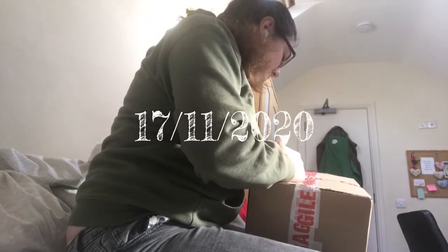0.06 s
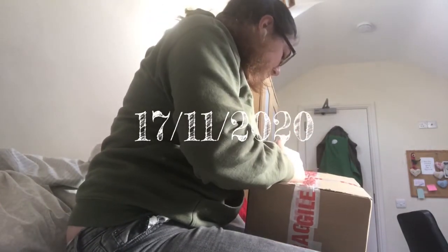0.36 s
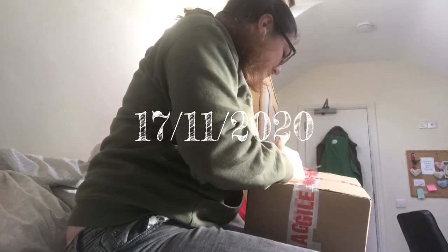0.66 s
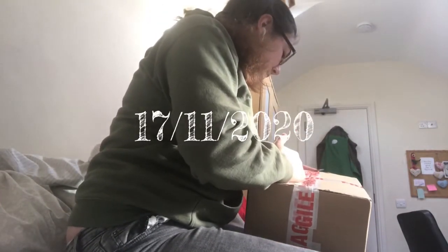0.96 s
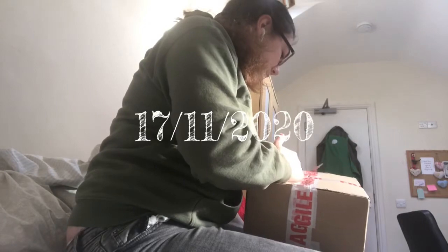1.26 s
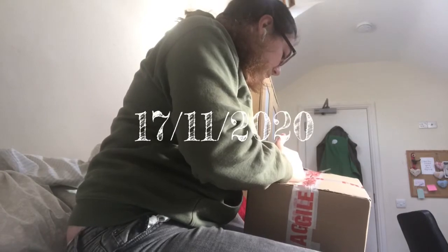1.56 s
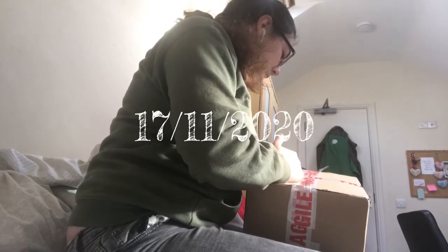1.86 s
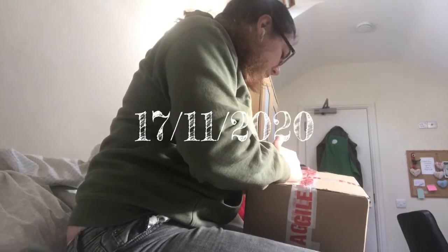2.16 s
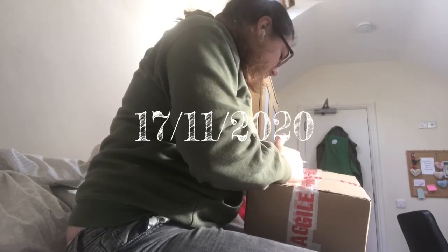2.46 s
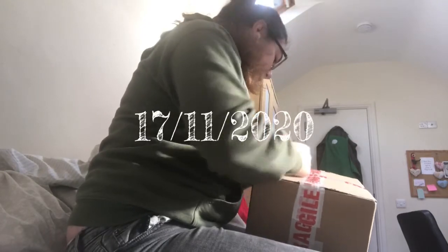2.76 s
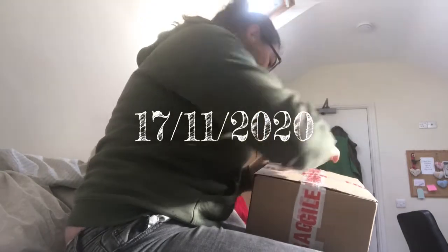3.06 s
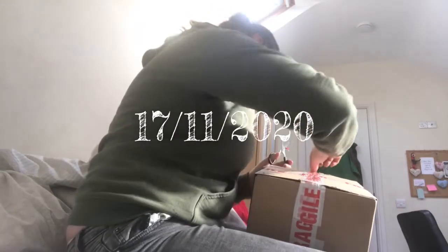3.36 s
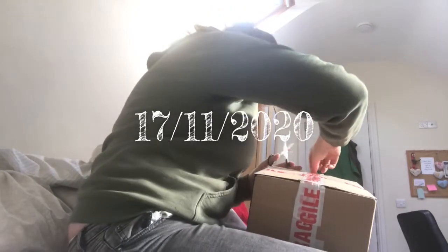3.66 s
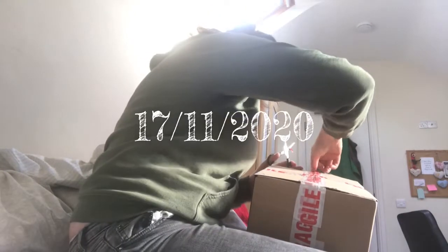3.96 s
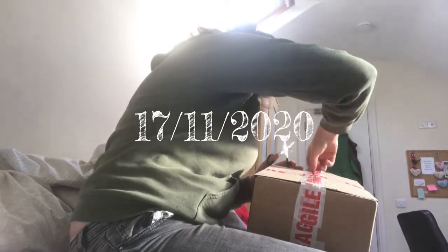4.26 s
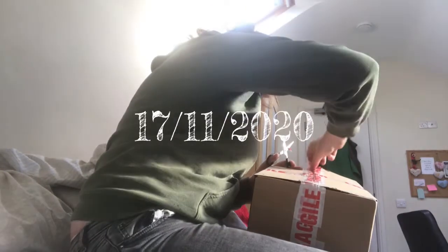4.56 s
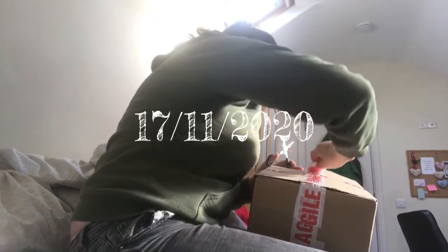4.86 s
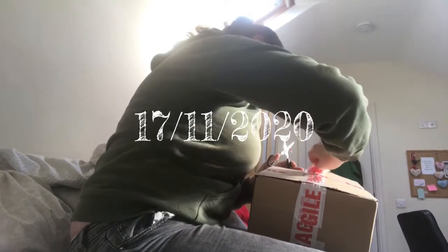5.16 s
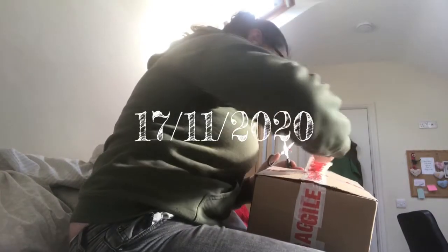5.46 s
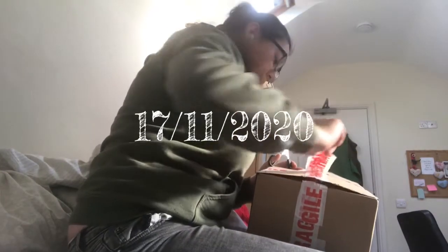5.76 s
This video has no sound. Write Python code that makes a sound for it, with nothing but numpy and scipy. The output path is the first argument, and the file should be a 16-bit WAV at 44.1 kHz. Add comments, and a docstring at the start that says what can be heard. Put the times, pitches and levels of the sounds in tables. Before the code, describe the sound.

Fingers softly rub, scrape and bump a hollow cardboard box, picking at the packing tape with small clicks and a few cracks of the board. The picking grows sharper, and near the end the tape peels away in a loud run of crackling snaps while the lid rumbles underneath. The box is close to the microphone in a small bedroom with a faint steady hiss.

```python
"""Packing tape peels off a cardboard box in a run of sharp snaps, while the lid it pulls on rumbles.
Each time the glue lets go, a small patch of taut film rings. Leading up to the pull, fingers bump the
hollow box, scrape it in tiny stick-slips, squeak on the tape and pick at the seam; the board cracks
as its fibres break. The box sits close by on a lap, in a small bedroom with a faint steady hiss."""
import sys
import numpy as np
from scipy import signal
from scipy.fft import rfft, irfft
from scipy.io import wavfile

SR = 44100
rng = np.random.default_rng(int(sys.argv[2]) if len(sys.argv) > 2 else 0)


def to_wav(sig):
    """Store sig (one row per channel, or 1-D mono) as 16-bit WAV at the path in sys.argv[1].

    Samples outside -1..1 are clipped; the rate is SR.
    """
    pcm = np.clip(np.atleast_2d(sig), -1, 1) * 32767
    pcm = np.round(pcm).astype(np.int16)
    wavfile.write(sys.argv[1], SR, pcm.T)  # frames by channels


N = 255780
TIME = np.arange(N) / SR

# tone of the room's steady bed: (frequency [Hz], gain [dB])
ROOM_TONE_EQ = [(25, -1), (70, 1.5), (130, -1.5), (300, -10), (600, -11), (1500, -15.5), (3500, -19.5),
                (7000, -23), (16000, -27)]
# what the walls send back: (frequency [Hz], gain [dB])
WALL_EQ = [(60, -7), (300, -6.5), (1000, -8.5), (2000, -6), (4000, -10), (8000, -10), (16000, -6)]
# notches of the microphone port: (frequency [Hz], width [Hz], depth [0-1])
PORT_NOTCHES = [(2887, 690, 0.55), (10500, 2300, 0.47)]

# a finger chatters on the smooth tape: (time [s], peak [dB], pitch [Hz], length [s])
SQUEAKS = [(0, -60, 3670, 0.018), (0.107, -63, 890, 0.074), (0.704, -59, 2810, .012),
           (1.704, -59.5, 2750, 0.011), (3.707, -55.5, 2770, 0.0064)]
# fingers and forearm bump the box: (time [s], peak [dB], panel pitch [Hz])
BUMPS = [(.208, -46.5, 365), (.228, -43.5, 328), (0.73, -48, 305), (.813, -41.5, 319), (.848, -41, 314),
         (1.388, -48, 309), (1.444, -42.5, 286), (1.588, -46, 313), (1.632, -39.5, 298),
         (1.9994, -38.5, 303), (2.809, -38.5, 237), (2.826, -40, 180), (2.842, -46, 136), (2.851, -46, 74),
         (3.667, -43.5, 329), (5.126, -45, 308), (5.272, -46.5, 313), (5.496, -39, 256), (5.666, -30, 280),
         (5.746, -31.5, 285)]
# ring of a box panel: (frequency [multiple of its pitch], gain [dB], t60 [s])
PANEL_MODES = [(.72, -7.5, 0.03), (1.002, 13.5, 0.031), (1.268, 6, 0.023), (1.7, -8.5, 0.016),
               (2.45, -11, 0.049)]
# finger strokes: (time of hardest press [s], length [s], rumble [dB], scrape [dB], crackle [dB])
STROKES = [(0.01, .09, -57, -67, -67.5), (0.235, 0.09, -56, -67.5, -80), (0.38, 0.091, -58, -64.5, -67.5),
           (0.764, .05, -66, -77, -71), (.855, 0.097, -59.5, -63, -61.5), (1.184, .12, -59, -61.5, -60.5),
           (1.474, 0.08, -63, -69, -63), (1.554, .08, -62, -75, -67.5), (1.635, 0.069, -63, -64, -66),
           (1.779, 0.07, -60, -67.5, -64.5), (1.902, 0.059, -68, -56.5, -59.5),
           (2.028, 0.15, -62, -67, -69.5), (2.114, 0.035, -48.5, -51, -51), (2.164, 0.084, -53.5, -52, -61),
           (2.288, 0.096, -60.5, -78, -63.5), (2.66, 0.052, -57.5, -63.5, -65.5),
           (2.737, 0.091, -60, -64, -64.5), (2.839, 0.11, -57.5, -65, -70), (2.98, 0.045, -64.5, -87, -88),
           (3.106, 0.082, -61.5, -74, -91), (3.205, 0.12, -68.5, -70.5, -79),
           (3.431, 0.089, -64.5, -67.5, -79), (3.578, 0.085, -59.5, -67, -74),
           (3.701, 0.094, -67, -75, -67), (4.113, 0.1, -66.5, -68.5, -71.5), (4.196, 0.13, -64, -84, -64),
           (4.404, 0.13, -58, -65, -60), (4.492, 0.074, -74, -61.5, -63), (4.583, 0.049, -65, -60, -63),
           (4.682, 0.065, -58.5, -64, -54.5), (4.862, .08, -84, -70, -71), (4.96, 0.1, -54.5, -62.5, -60)]
# hollow body of the rubbed box: (frequency [Hz], width [Hz], gain [dB])
BOX_MODES = [(210, 57, -9.5), (275, 33.4, -3), (340.6, 61.3, 0), (377.6, 98.3, -2.5), (497, 73.5, -9.5),
             (720, 125, -22.5)]
# the whole lid flexing: (frequency [Hz], width [Hz], gain [dB])
LID_MODES = [(42, 22, -17), (72.7, 27, 1), (94.3, 11, 2), (121.4, 30, -4), (201, 37, -1), (277, 39, -9.5)]
# rasp of scraped board: (frequency [Hz], gain [dB])
SCRAPE_EQ = [(200, -27.5), (500, -2), (800, -2.5), (1300, -0.5), (2200, -6.5), (2900, -3), (4000, -13),
             (8000, -33), (16000, -45)]
# the board cracks: (time [s], level over 3 ms [dB], centre [Hz], decay [s], thud before trims [dB])
CRACKS = [(0.075, -66, 1400, .002, -51), (0.321, -76, 1600, .0028, -48.5),
          (0.779, -69, 1060, 0.0028, -46.5), (1.065, -61, 2550, 0.0013, -50.5),
          (1.8706, -41, 2000, .0014, -35.5), (2.098, -44.5, 1720, 0.0033, -34.5),
          (2.733, -49, 4540, 0.0011, -41.5), (3.42, -60.5, 2040, 0.0056, -54),
          (3.688, -55, 2400, 0.0015, -58), (4.394, -48, 5550, 0.0026, -47),
          (4.5705, -44.5, 6050, 0.0019, -56), (4.621, -44, 4700, 0.0052, -52),
          (4.6265, -37.5, 2220, 0.0004, -54), (4.662, -32.5, 6050, 0.0013, -40),
          (4.6641, -37.5, 1680, 0.0044, -46), (4.674, -40, 3060, 0.0011, -36.5),
          (5.3362, -35, 3440, 0.0028, -40), (5.501, -31.5, 2850, 0.0044, -41),
          (5.543, -30.5, 4100, 0.0084, -43)]
# short ring of the stiff liner around a crack: (frequency [Hz], width [Hz], gain [dB])
LINER_MODES = [(553, 55, 9), (770, 72, 7.5), (955, 150, 1), (1296, 150, 0), (1650, 160, 1.5),
               (2450, 100, -14)]

# contour of the long pull, before its trims: (time [s], rumble [dB], peeling edge [dB])
PULL_CONTOUR = [(5.02, -66, -68), (5.148, -51.5, -55.5), (5.292, -57.5, -57), (5.358, -48, -56.5),
                (5.414, -50, -53), (5.51, -38.5, -45.5), (5.576, -46, -44), (5.688, -42, -51.5),
                (5.8, -52, -53.5)]
# fizz of the tape's glue: (frequency [Hz], gain [dB])
GLUE_EQ = [(400, -47), (1500, -2.5), (3900, -4.5), (6200, 4), (8000, -7), (11000, -0.5), (16000, -38)]
# patches of film, each crackling on its own: (frequency [Hz], width [Hz], gain [dB])
FILM_PATCHES = [(2440, 2260, 2.5), (4300, 810, -1), (5840, 3100, 0), (6300, 1100, -2.5), (13100, 8500, -5)]
# featured snaps of the film as the glue lets go: (time [s], peak [dB], centre [Hz])
ACCENT_SNAPS = [(1.4465, -41.5, 3900), (1.4612, -39, 5870), (2.0751, -40, 4900), (2.6715, -40, 4100),
                (2.7215, -31.5, 6240), (2.8395, -38, 5160), (3.4692, -45.5, 5500), (4.0214, -37, 5100),
                (4.4007, -35, 4800), (4.4346, -37, 5500), (4.4716, -40, 5500), (4.5792, -33, 6060),
                (4.6383, -33, 4730), (4.8234, -42, 3520), (4.9478, -34.5, 3800), (5.0184, -32.5, 6460),
                (5.0529, -38, 7400), (5.1104, -29.5, 5900), (5.1465, -23, 8600), (5.181, -10, 6400),
                (5.1941, -15.5, 7300), (5.2018, -20.5, 4800), (5.2268, -25, 6550), (5.2732, -24.5, 4430),
                (5.2884, -22, 5230), (5.2963, -20, 4600), (5.4528, -24.5, 4330), (5.4561, -16, 4600),
                (5.4663, -15, 5150), (5.4937, -22, 5800), (5.5194, -21, 4470), (5.5776, -16.5, 5600),
                (5.5944, -20, 4180), (5.6019, -14.5, 4620), (5.6883, -23.5, 9600), (5.7482, -25, 6000)]


def undb(db):
    """Decibels to gain."""
    return 10 ** (np.asarray(db) / 20)


def unit(x):
    """Scale to rms 1."""
    return x / np.sqrt(np.mean(x ** 2))


def peak(x, db):
    """Scale to a peak level."""
    return x * undb(db) / np.abs(x).max()


def punch(x, db):
    """Scale a hit so that its energy, packed into 3 ms, has the given level."""
    return x * undb(db) * np.sqrt(.003 * SR / np.sum(x ** 2))


def add(track, s, x):
    """Mix x into the track at time s."""
    i = max(int(s * SR), 0)
    track[i:i + len(x)] += x[:max(N - i, 0)]


def rolloff(x, order, hz, kind):
    """Low-pass or high-pass filter."""
    return signal.sosfilt(signal.butter(order, hz, kind, fs=SR, output="sos"), x)


def eq(x, points, size=4096):
    """Minimum-phase EQ through the given (Hz, dB) points."""
    hz, db = np.transpose(points)
    bins_hz = np.fft.rfftfreq(size, 1 / SR)
    gain = undb(np.interp(np.log(bins_hz + 1), np.log(hz), db))
    cepstrum = irfft(np.log(gain))
    cepstrum[1:size // 2] *= 2
    cepstrum[size // 2 + 1:] = 0
    return signal.fftconvolve(x, irfft(np.exp(rfft(cepstrum))))[:len(x)]


def resonate(x, hz, width):
    """One resonance, gain 1 at its centre."""
    return signal.lfilter(*signal.iirpeak(hz, hz / min(width, SR / 4), fs=SR), x)


def body(x, modes):
    """A bank of resonances with alternating polarity."""
    return sum((-1) ** k * undb(db) * resonate(x, hz, width) for k, (hz, width, db) in enumerate(modes))


def wander(rate):
    """Random modulator of rms 1 that turns rate times a second."""
    knots = rng.standard_normal(N // 20)
    return unit(np.interp(TIME * rate, np.arange(len(knots)), knots))


def slips(rate, spread_db):
    """Stick-slip ticks, about rate a second: many small, a few large."""
    size = undb(spread_db * np.minimum(rng.exponential(size=N), 4))
    return unit((rng.random(N) < rate / SR) * size * rng.choice([-1, 1], N))


def burst(decay_s, hz, width_ratio, grit, edge):
    """One release and the fibres that follow it ring a small patch of film or board."""
    t = np.arange(SR // 20) / SR
    push = grit * rng.standard_normal(len(t)) * np.exp(-t / decay_s)
    push[0] += 1
    ring = resonate(resonate(push, hz, width_ratio * hz), hz, 2 * width_ratio * hz)
    # the smaller and tauter the patch, the more bite it radiates
    bite = edge * (hz / 6000) ** 2 * rolloff(push, 2, 11000, "high")
    return ring - bite


def room_tone(level_db=-67):
    """The bedroom's bed of faint hiss, weighted to the lows."""
    return unit(eq(rng.standard_normal(N), ROOM_TONE_EQ)) * undb(level_db)


def room(x, t60_low=0.32, t60_high=0.25, build_s=0.0028, predelay_s=0.0049, near_db=-16, near_s=0.0015):
    """Box and arms scatter the sound at once; then the walls' tail builds and dies, treble first."""
    t = np.arange(SR // 2) / SR
    noise = rng.standard_normal(len(t))
    low = rolloff(noise, 1, 3000, "low")
    high = noise - low
    tail = low * undb(-60 * t / t60_low) + high * undb(-60 * t / t60_high)
    tail *= 1 - np.exp(-np.maximum(t - predelay_s, 0) / build_s)
    near = high * np.exp(-t / near_s)  # small things scatter only the treble
    response = eq(tail / np.linalg.norm(tail), WALL_EQ) + undb(near_db) * near / np.linalg.norm(near)
    return signal.fftconvolve(x, response)[:N]


def squeaks():
    """A finger sticks and slips on the tape in brief, rough tones."""
    out = np.zeros(N)
    for s, db, hz, length in SQUEAKS:
        swell = np.hanning(int(length * SR))
        pitch = hz * (1 + 0.084 * wander(rate=780)[:len(swell)])
        add(out, s, peak(swell * np.sin(2 * np.pi * np.cumsum(pitch) / SR), db))
    return out


def knock(hz, attack_s, scatter=0.049):
    """A push rings the damped modes of one panel, each a little detuned."""
    t = np.arange(SR // 6) / SR
    detunes = 1 + scatter * rng.standard_normal(len(PANEL_MODES))
    ring = sum(undb(db) * np.sin(2 * np.pi * hz * ratio * detune * t) * undb(-60 * t / t60)
               for (ratio, db, t60), detune in zip(PANEL_MODES, detunes))
    return ring * (1 - np.exp(-t / attack_s))


def bumps():
    """Dull, hollow knocks of the hands on the box."""
    out = np.zeros(N)
    for s, db, hz in BUMPS:
        add(out, s, peak(knock(hz, attack_s=0.0048), db))
    return out


def finger_strokes(attack_share=0.52, release_share=0.47, fidget_db=(-72, -77.5, -80)):
    """Envelopes of rumble, scrape and crackle as each stroke swells and lets go."""
    power = undb(fidget_db)[:, None] ** 2 * np.ones(N)  # the hands never quite rest
    for s, length, *levels_db in STROKES:
        along = (TIME - s) / length
        falloff = np.where(along < 0, (along / attack_share) ** 2, along / release_share)
        pressure = np.exp(-np.minimum(falloff, 20))
        power += (undb(levels_db)[:, None] * pressure) ** 2
    return np.sqrt(power)


def box_rumble(grip):
    """Slips under an uneven grip ring the hollow box."""
    drag = slips(rate=600, spread_db=4.5) * undb(2 * grip)
    return unit(body(drag, BOX_MODES))


def lid_heave():
    """The low end: slips flex the whole lid."""
    flex = body(slips(rate=500, spread_db=3), LID_MODES)
    return unit(rolloff(flex, 2, 330, "low"))


def board_scrape(grip):
    """Dense slips blur into a dry rasp on the board."""
    drag = slips(rate=1100, spread_db=2.5) * undb(2.44 * grip)
    return unit(eq(drag, SCRAPE_EQ))


def board_cracks(liner_trim_db=-7, panel_trim_db=-3):
    """Fibres break in a short volley; the liner rings and the panel springs back just after."""
    out = np.zeros(N)
    for s, db, hz, decay_s, thud_db in CRACKS:
        fibres = burst(decay_s, hz, width_ratio=0.95, grit=1, edge=0.12)
        liner = body(burst(decay_s, hz=1040, width_ratio=2.7, grit=0.21, edge=0), LINER_MODES)
        panel = knock(hz=310, attack_s=0.001)
        add(out, s, punch(fibres, db))
        add(out, s + 0.00035, punch(liner, thud_db + liner_trim_db))
        add(out, s + 0.00094, peak(panel, thud_db + panel_trim_db))
    return out


def tape_pull(fade_in_s=0.083, trims_db=(-2.5, -3, 1)):
    """Envelopes of rumble, scrape and crackle as the long pull tears the glue from the board."""
    times, rumble_db, edge_db = np.transpose(PULL_CONTOUR)
    rumble = undb(np.interp(TIME, times, rumble_db))
    edge = undb(np.interp(TIME, times, edge_db))
    fade_in = np.clip(1 + (TIME - times[0]) / fade_in_s, 0, 1)
    return undb(trims_db)[:, None] * np.array([rumble, edge, edge]) * fade_in


def tape_crackle(grip, fizz_db=-2.5):
    """Each tiny release rings one patch of film, so the colour shifts by the grain; the glue fizzes."""
    patches = sum(undb(db) * unit(resonate(slips(rate=450, spread_db=3.5), hz, width))
                  for hz, width, db in FILM_PATCHES)
    grains = unit(rolloff(patches, 2, 1600, "high"))
    fizz = unit(eq(slips(rate=1400, spread_db=4.5), GLUE_EQ))
    return unit((grains + undb(fizz_db) * fizz) * undb(2 * grip))


def tape_snaps(crackle, lifted_s=4.12, per_second=35, over_crackle_db=19.5, spread_db=3):
    """Taut film clicks as the glue lets go: placed accents, plus random snaps riding the crackle."""
    centre_hz, spread_octaves = 5230, 0.14
    cues = list(ACCENT_SNAPS)
    s = lifted_s  # the random snaps start once the tape's end is lifted
    for wait, size, pitch in rng.standard_normal((400, 3)):
        s += np.exp(.5 * wait) / per_second
        if s < TIME[-1]:
            db = 20 * np.log10(crackle[int(s * SR)]) + over_crackle_db + spread_db * size
            hz = min(centre_hz * 2 ** (spread_octaves * pitch), SR / 4)
            cues.append((s, db, hz))
    out = np.zeros(N)
    for s, db, hz in cues:
        click = burst(decay_s=0.00046, hz=hz, width_ratio=0.91, grit=0.25, edge=0.019)
        add(out, s, peak(click, db))
    return out


def scene():
    """Tape and box up front, with the bedroom's short reverb and room tone behind."""
    fingers, pull = finger_strokes(), tape_pull()
    rumble, scrape, crackle = np.hypot(fingers, pull)
    # the lid follows the rumble, and heaves most while the tape pulls on it
    heave = np.hypot(undb(-12) * fingers[0], undb(-5) * pull[0])
    grip = wander(rate=98)  # one uneven grip flutters rumble, scrape and crackle together
    handling = box_rumble(grip) * rumble + lid_heave() * heave
    handling += board_scrape(grip) * scrape + tape_crackle(grip) * crackle
    handling += board_cracks() + bumps() + squeaks()
    bed = room_tone()
    snaps = tape_snaps(crackle)
    # the lifted tape faces the microphone, so less of it goes by way of the walls
    reverb = room(handling + undb(-1.5) * snaps)
    return (handling + snaps + reverb + bed)[None]


def record(dry, low_cut_hz=37, high_cut_hz=16200):
    """The microphone port notches the treble; the recorder cuts the lowest bass and the top."""
    for hz, width, depth in PORT_NOTCHES:
        dry = dry - depth * resonate(dry, hz, width)
    dry = rolloff(dry, 4, low_cut_hz, "high")
    return signal.sosfilt(signal.ellip(8, .2, 60, high_cut_hz, fs=SR, output="sos"), dry)


dry = scene()
out = record(dry)
to_wav(out)
```